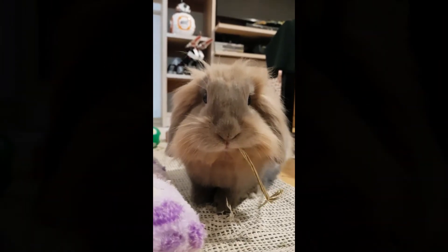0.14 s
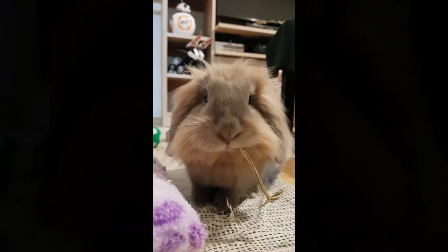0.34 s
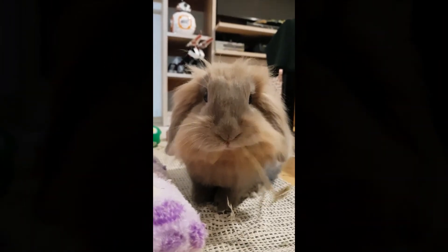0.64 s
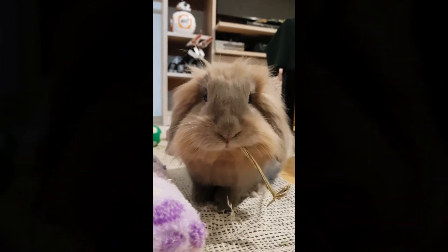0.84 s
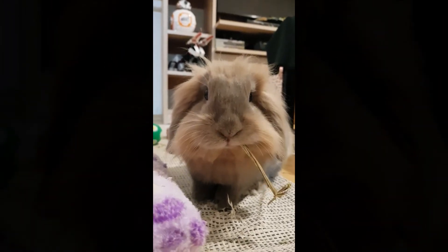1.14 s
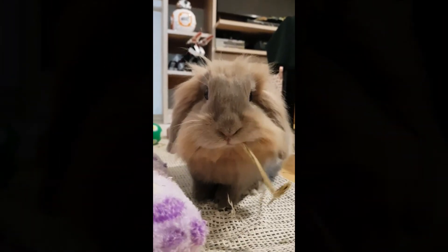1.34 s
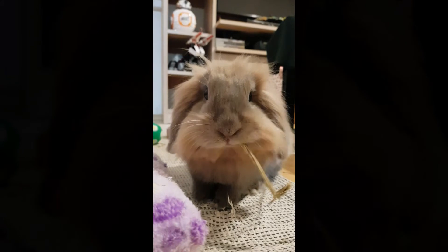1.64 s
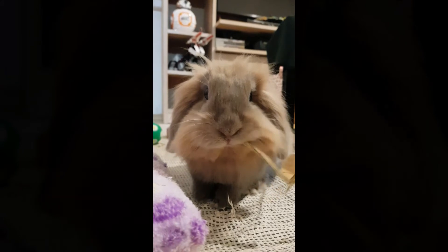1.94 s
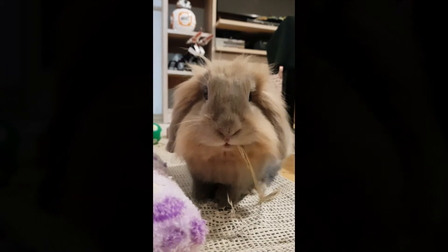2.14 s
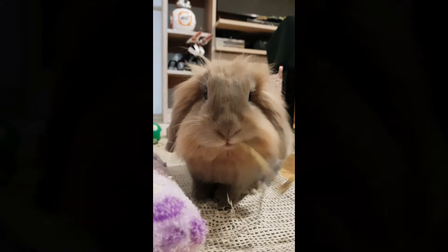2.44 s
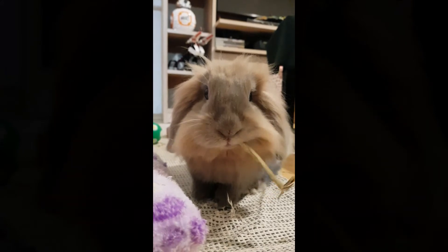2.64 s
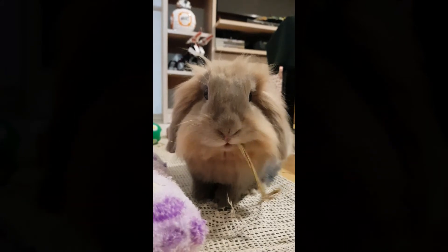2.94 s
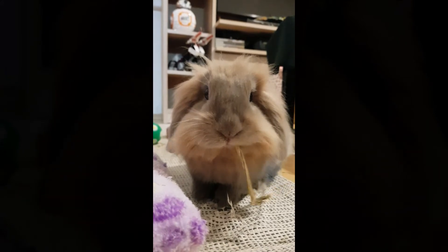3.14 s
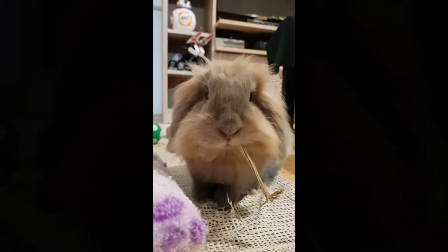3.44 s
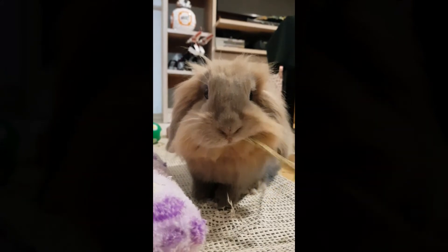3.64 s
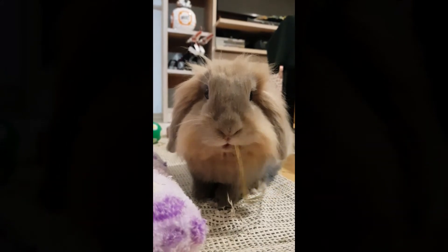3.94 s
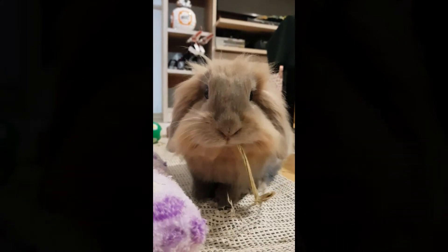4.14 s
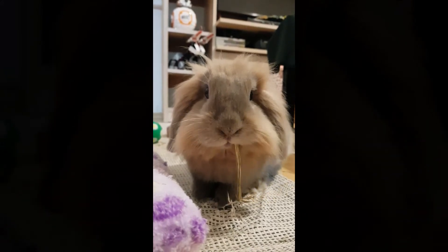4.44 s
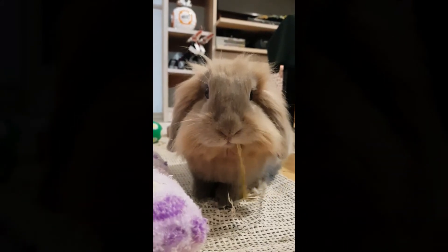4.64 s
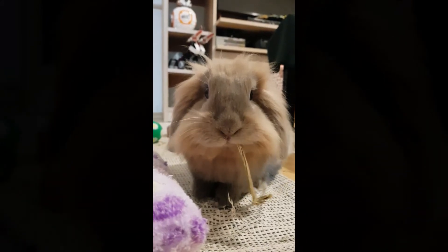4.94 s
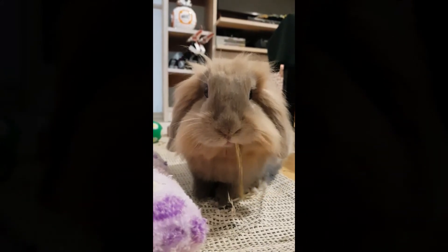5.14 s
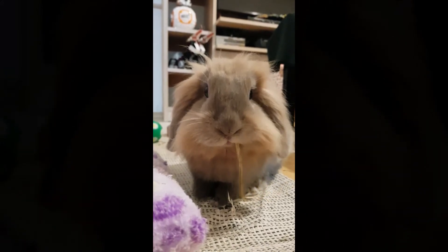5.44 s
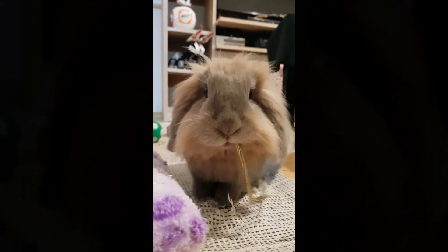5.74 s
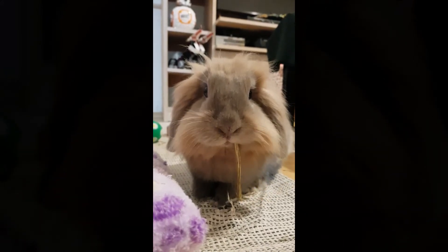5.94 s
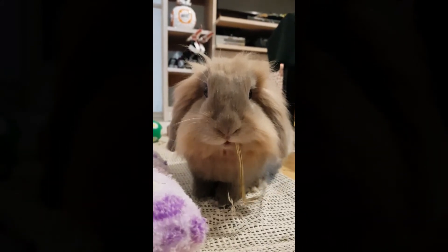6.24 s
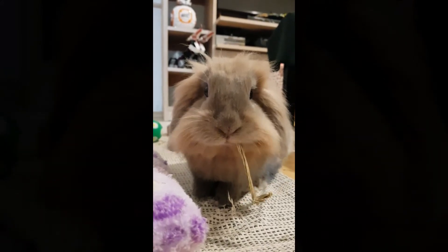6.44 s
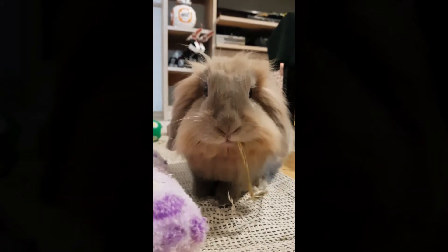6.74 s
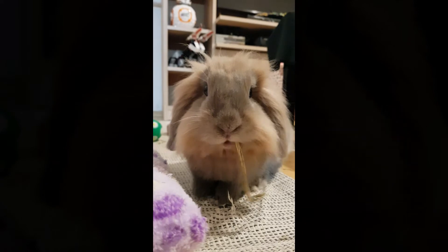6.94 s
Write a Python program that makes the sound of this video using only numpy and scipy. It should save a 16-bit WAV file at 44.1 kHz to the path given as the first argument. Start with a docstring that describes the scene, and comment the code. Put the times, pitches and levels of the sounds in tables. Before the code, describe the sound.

A rabbit nibbles a brittle hay stalk, a few crisp cracks and faint ticks, beneath trembling finger rumble and late handling thumps on the right.

```python
"""A rabbit nibbles a stalk of hay in a quiet room, close to a hand-held phone.
A faint low drone dies away within the first second, leaving hum, moving air and hiss from filtered noise.
From the start a finger on the right microphone shuts the room out; it trembles, leans and jerks.
The dry stalk then snaps and splinters, hardest near 3 s, as the teeth tick and the stalk swishes between them.
The finger's hardest jerks come late, with thumps from pressure steps and scuffs that ring the phone's case."""
import sys
import numpy as np
from scipy import signal
from scipy.fft import rfft, irfft, next_fast_len
from scipy.io import wavfile
from scipy.ndimage import uniform_filter1d, map_coordinates

SR = 44100
rng = np.random.default_rng(int(sys.argv[2]) if len(sys.argv) > 2 else 0)


def transcribe(u):
    """Save the signal u as a 16-bit wav file named by the first command-line argument.

    u: samples, shape (n,) or (channels, n), limited to [-1, 1]; the rate is SR.
    q: integer samples, one column per channel.
    """
    v = np.clip(np.atleast_2d(u).T, -1, 1)
    q = np.round(v * 32767).astype(np.int16)
    wavfile.write(sys.argv[1], SR, q)


N = 312580


def amp(db):
    """Decibels to gain."""
    return 10 ** (np.asarray(db) / 20)


def unit(x):
    """Scale to rms 1."""
    return x / np.sqrt(np.mean(x ** 2) + 1e-30)


def along(points, hz):
    """Read (f/Hz, value) points on a log frequency axis."""
    f, value = np.transpose(points)
    return np.interp(np.log(hz + 1), np.log(f + 1), value)


def over_time(points):
    """Draw straight lines through (t/s, level/dB) points."""
    return np.interp(np.arange(N) / SR, *np.transpose(points))


def filtered(x, response):
    """Shape x by a response of frequency, padded so that the ring-out does not wrap round."""
    n = x.shape[-1]
    padded = next_fast_len(n + SR // 10)
    spectrum = rfft(x, padded) * response(np.fft.rfftfreq(padded, 1 / SR))
    return irfft(spectrum, padded)[..., :n]


def resonance(hz, centre_hz, width_hz):
    """Response of one damped mode, with gain 1 at its centre."""
    damping = 1j * hz * width_hz
    return damping / (centre_hz ** 2 - hz * hz + damping)


def bell(hz, centre_hz, width_hz):
    """Bell-shaped band; the width is one standard deviation."""
    return np.exp(-.5 * ((hz - centre_hz) / width_hz) ** 2)


def noise(spectrum):
    """Steady noise with the given density in dB per Hz."""
    return filtered(rng.standard_normal(N), lambda hz: amp(along(spectrum, hz)) * np.sqrt(SR / 2))


def add(track, s, sound):
    """Mix a sound into the track at time s."""
    part = track[round(s * SR):][:len(sound)]
    part += sound[:len(part)]


def wobble(rate):
    """A smooth random curve, rate knots a second."""
    return map_coordinates(rng.standard_normal(N // 100), [np.arange(N) * rate / SR])


# Hiss of each microphone: f/Hz, level/dB per Hz
HISS_SPECTRUM = [(100, -116), (1500, -117), (3000, -121), (4800, -126), (5800, -125), (7500, -131),
                 (10000, -126), (12000, -119), (15500, -118)]


def microphone_hiss():
    """Steady self-noise, drawn afresh for each microphone."""
    return noise(HISS_SPECTRUM)


# Moving air in the room: f/Hz, level/dB per Hz
AIR_SPECTRUM = [(20, -101), (65, -89.5), (120, -93), (180, -95), (245, -92.5), (350, -105), (600, -109),
                (1500, -115), (2500, -120), (5000, -130), (9000, -145)]


def room_air():
    """Moving air makes steady noise that thins out towards the treble."""
    return noise(AIR_SPECTRUM)


# Appliance motors: f/Hz, level/dB rms
MOTOR_TONES = [(80, -84), (99, -82.5), (120, -65.5), (127, -77)]


def appliance_hum():
    """Motors turn steadily, each a sine with a random starting phase."""
    t = np.arange(N) / SR
    hum = np.zeros(N)
    for hz, db in MOTOR_TONES:
        hum += amp(db) * np.sqrt(2) * np.sin(2 * np.pi * (hz * t + rng.random()))
    return hum


# A low drone in the room fades: t/s, level/dB
DRONE_LEVEL = [(0, -83), (.15, -77), (.3, -70.5), (.45, -79.5), (.7, -75), (.85, -103), (7.09, -100)]


def fading_drone(centre_hz=260, width_hz=45):
    """A narrow band of noise follows the drone's level."""
    drone = unit(filtered(rng.standard_normal(N), lambda hz: bell(hz, centre_hz, width_hz)))
    return amp(over_time(DRONE_LEVEL)) * drone


# Time for the room to die away by 60 dB: f/Hz, time/s
ROOM_DECAY = [(300, 0.45), (3000, 0.35), (14000, 0.16)]


def room(x):
    """The room's short answer is a tail of decaying noise; the treble dies first."""
    hz, t, cells = signal.stft(rng.standard_normal(SR // 2), SR, nperseg=256)
    decay_db = -60 * t / along(ROOM_DECAY, hz)[:, None]
    tail = signal.istft(cells * amp(decay_db), SR, nperseg=256)[1]
    return signal.fftconvolve(x, tail / np.linalg.norm(tail))[:N]


# Colour of the tremor, only its shape counts: f/Hz, level/dB per Hz
TREMOR_SPECTRUM = [(12, -22), (22, -24.5), (32, -8), (45, -0.5), (65, 1.5), (90, -10.5), (130, -26.5),
                   (200, -38.5), (300, -43.5), (450, -53.5), (800, -71.5), (2000, -100)]
# Slow unsteadiness of the grip, before the tremor gain: t/s, level/dB
GRIP_UNREST = [(0, -35), (0.25, -50.5), (0.65, -46.5), (1.1, -49.5), (1.7, -45.5), (2.3, -50.5),
               (2.7, -47.5), (2.92, -44.4), (3.1, -51), (3.55, -47), (3.72, -49.5), (4.15, -41.5),
               (4.35, -46.5), (4.65, -42), (5.05, -45), (5.4, -50.5), (5.7, -46), (7.09, -49.0)]
# The finger rests for an instant: t/s, level drop/dB
FINGER_RESTS = [(.24, 4.5), (1.395, 13.5), (2.345, 8), (3.384, 15), (4.3, 7), (4.895, 13), (5.905, 5.5)]
REST_S = 0.034  # from the middle of a rest to 1/e of its drop
WAVER_DB, WAVER_PER_S = 0.68, 14  # random waver: depth (dB), knots a second


def finger_tremor(gain_db=7.0):
    """The trembling finger pumps the air trapped in the port; it wavers, and now and then rests."""
    t = np.arange(N) / SR
    rest_db = sum(drop_db * np.exp(-((t - s) / REST_S) ** 2) for s, drop_db in FINGER_RESTS)
    level_db = over_time(GRIP_UNREST) + WAVER_DB * wobble(WAVER_PER_S) - rest_db
    rumble = unit(noise(TREMOR_SPECTRUM))
    # Flatten the noise's own slow swells, so that the level curve alone sets them
    swell = np.sqrt(np.abs(uniform_filter1d(rumble ** 2, size=SR // 10)))
    return amp(level_db + gain_db) * rumble / swell


# The finger leans slowly on the port: t/s, pressure step level/dB before the low cut
FINGER_LEANS = [(.024, 19.5), (.331, 19.5), (.714, 15), (1.61, 18), (2.801, 20), (2.86, 13), (2.91, 12),
                (4.175, 19), (4.57, 13.5), (4.751, 12), (5.005, 16.5), (5.854, 25), (6.383, 22)]
# The finger jerks and its skin catches on the case (the scuffs play these too):
# t/s, pressure step level/dB before the low cut, highest f/Hz of the scuff
FINGER_JERKS = [(0.046, -15.5, 250), (0.065, -19, 250), (0.789, -20.5, 900), (1.683, -7.5, 2200),
                (3.129, -14, 1100), (4.733, -16.5, 450), (4.785, -20.5, 400), (4.81, -11.5, 300),
                (4.826, -16, 200), (5.02, -17.5, 460), (5.229, -20, 250), (5.265, 0.5, 1000),
                (5.334, 1.5, 1050), (5.54, 2.5, 1050), (5.636, -19.5, 400), (6.277, 3, 1200)]
LEAN_RISE_S, JERK_RISE_S = 0.0084, .0017  # time scale of the pressure change (s)


def pressure_steps(rows, rise_s):
    """Sum of smooth steps, each rising around its own time."""
    t = np.arange(N) / SR
    return sum(amp(db) * (1 + np.tanh((t - s) / rise_s)) / 2 for s, db, *_ in rows)


def finger_thumps(low_cut_hz=68):
    """Leans and jerks step the pressure; the microphone's low cut makes each a short, falling thump."""
    pressure = -pressure_steps(FINGER_LEANS, LEAN_RISE_S) - pressure_steps(FINGER_JERKS, JERK_RISE_S)
    low_cut = signal.butter(5, low_cut_hz, "high", fs=SR, output="sos")
    return signal.sosfilt(low_cut, pressure)


# Modes of the phone's case: f/Hz, width/Hz, level/dB
CASE_MODES = [(330, 33, 4.5), (440, 71, -0.5), (540, 100, 1.5), (640, 99, 1.5), (703, 132, -0.5),
              (1010, 290, -10), (1440, 1200, -18.5)]
# The skin rubs along the case without a jerk, mostly as the finger leans: t/s, level/dB before the treble cut
SKIN_RUBS = [(2.508, -56.5), (4.16, -60.5), (4.612, -65), (6.384, -58.5)]
SCUFF_DB, SCUFF_LEAD_S = -48, .002  # level against the jerk's step; how much earlier the skin lets go
SLIP_FADE_S = .01  # the slip fades to 1/e


def case_response(hz):
    """The case rings in several modes of alternating sign."""
    return sum((-1) ** k * amp(db) * resonance(hz, centre_hz, width_hz)
               for k, (centre_hz, width_hz, db) in enumerate(CASE_MODES))


def scuff(high_hz, slipping):
    """Skin lets go with a click and slips as fading noise; its softness keeps the treble out."""
    t = np.arange(SR // 10) / SR
    force = rng.standard_normal(len(t)) * np.exp(-t / SLIP_FADE_S)
    force *= slipping / np.linalg.norm(force)
    force[0] = 1
    knock = filtered(force, case_response)
    knock *= np.sqrt(SR * SLIP_FADE_S / 2) / np.linalg.norm(knock)
    return signal.sosfilt(signal.butter(3, high_hz, fs=SR, output="sos"), knock)


def finger_scuffs(jerk_slipping=0.94, rub_slipping=3.5, rub_hz=750):
    """Skin catches, slips for a moment and rings the case, louder for a harder jerk."""
    track = np.zeros(N)
    for s, db, high_hz in FINGER_JERKS:
        add(track, s - SCUFF_LEAD_S, amp(db + SCUFF_DB) * scuff(high_hz, jerk_slipping))
    for s, db in SKIN_RUBS:
        add(track, s, amp(db) * scuff(rub_hz, rub_slipping))
    return track


# The stalk slides between the teeth: t/s, level/dB before the stroke's fade, centre f/Hz, width/Hz
STALK_SLIDES = [(2.545, -71, 11800, 1200), (3.368, -74, 9200, 600), (4.163, -76, 13000, 2000),
                (4.166, -69, 9600, 600), (4.169, -71, 6900, 420)]


def stalk_swishes(rise_s=0.0049, fade_s=0.033):
    """Friction makes a thin band of noise that rises quickly and fades."""
    track, t = np.zeros(N), np.arange(SR // 5) / SR
    stroke = (1 - np.exp(-t / rise_s)) * np.exp(-t / fade_s)
    for s, db, centre_hz, width_hz in STALK_SLIDES:
        friction = filtered(rng.standard_normal(len(t)), lambda hz: bell(hz, centre_hz, width_hz))
        add(track, s, amp(db) * stroke * unit(friction))
    return track


def crack(low_hz, high_hz, length, tearing):
    """One sharp break and the tearing fibres behind it, with the energy of one millisecond at rms 1."""
    t = np.arange(SR // 20) / SR
    fibres = rng.standard_normal(len(t)) * np.exp(-2 * t / length)
    fibres *= tearing / np.linalg.norm(fibres)
    fibres[0] = -1  # the break itself
    edges = [low_hz, np.clip(high_hz, low_hz + 100, SR / 2 - 100)]
    burst = signal.sosfilt(signal.butter(3, edges, "band", fs=SR, output="sos"), fibres)
    return burst / np.linalg.norm(burst) * np.sqrt(SR / 1000)


# Ticks of the teeth: t/s, level/dB before the trim, highest f/Hz
TOOTH_TICKS = [(2.2685, -58, 2120), (2.491, -58, 1170), (3.114, -57.5, 2170), (6.062, -63.5, 3800),
               (6.393, -62, 1800)]


def tooth_ticks(trim_db=-5):
    """Each tick of the teeth is a duller crack, one octave wide."""
    track = np.zeros(N)
    for s, db, high_hz in TOOTH_TICKS:
        add(track, s, amp(db + trim_db) * crack(high_hz / 2, high_hz, length=0.0033, tearing=0.84))
    return track


# Breaks of the stalk: t/s, level/dB before the trim, lowest f/Hz, highest f/Hz
STALK_BREAKS = [(.651, -61.5, 4500, 11000), (1.4, -51, 600, 14000), (1.9604, -44.5, 2500, 15000),
                (2.541, -48.5, 3530, 15850), (3.0604, -31, 800, 15530), (3.1325, -49, 4520, 14400)]
SNAP_S = 0.0014  # length of a break
STALK_HZ, STALK_WIDTH_HZ, STALK_DB = 5370, 870, -3  # the hollow stalk's ring
# Fibres go on tearing after each break; their level is against the break
SPLINTER_DB, SPLINTER_DELAY_S, SPLINTER_S, SPLINTER_LOW_HZ = -9.5, .012, 0.11, 4200


def stalk_response(hz):
    """The hollow stalk rings briefly on top of the plain break."""
    return 1 + amp(STALK_DB) * resonance(hz, STALK_HZ, STALK_WIDTH_HZ)


def stalk_snaps(trim_db=-13.5):
    """The brittle stalk cracks and rings, then its fibres splinter."""
    track = np.zeros(N)
    for s, db, low_hz, high_hz in STALK_BREAKS:
        snap = filtered(crack(low_hz, high_hz, SNAP_S, tearing=0.87), stalk_response)
        splinter = crack(SPLINTER_LOW_HZ, high_hz, SPLINTER_S, tearing=4)
        add(track, s, amp(db + trim_db) * snap)
        add(track, s + SPLINTER_DELAY_S, amp(db + trim_db + SPLINTER_DB) * splinter)
    return track


def scene(covered_db=-19, echo_db=-7):
    """The left microphone hears the room; the right one hears mostly the finger."""
    background = appliance_hum() + room_air() + fading_drone()
    rabbit = stalk_swishes() + tooth_ticks() + stalk_snaps()
    air = background + rabbit + amp(echo_db) * room(rabbit)
    finger = finger_tremor() + finger_thumps() + finger_scuffs()
    left = air + microphone_hiss()
    right = amp(covered_db) * air + finger + microphone_hiss()
    return np.array([left, right])


def record(dry, top_hz=15750):
    """The phone keeps nothing above its band limit."""
    return filtered(dry, lambda hz: hz < top_hz)


dry = scene()
out = record(dry)
transcribe(out)
```